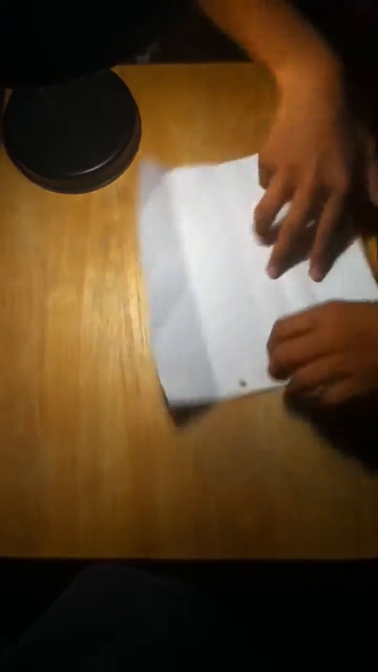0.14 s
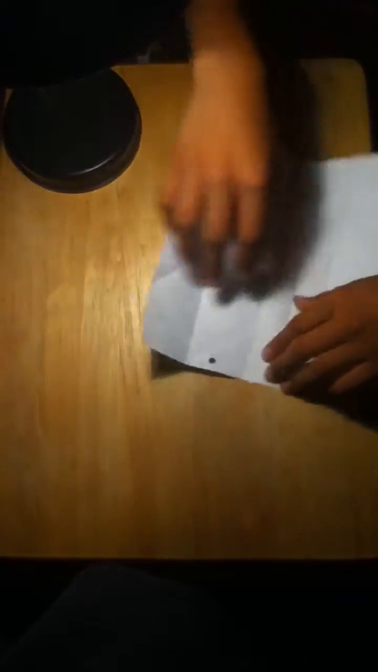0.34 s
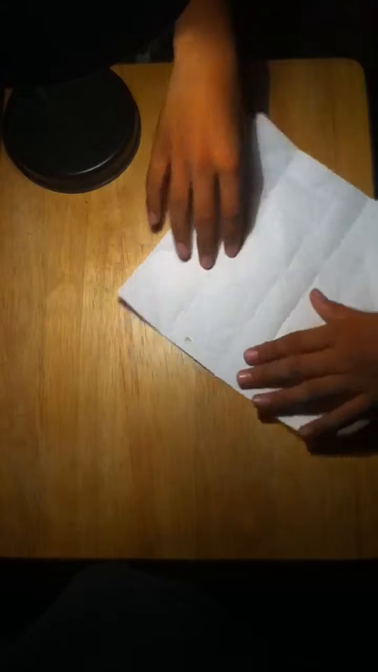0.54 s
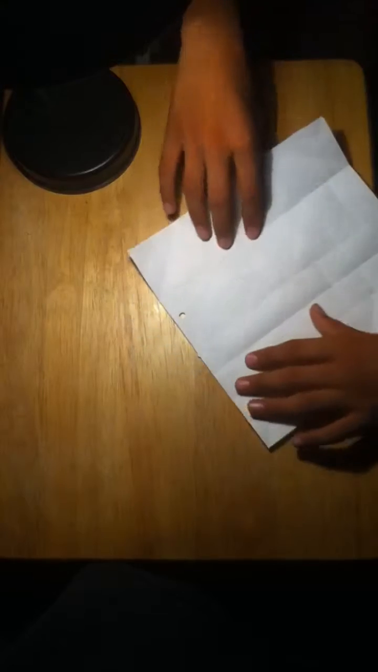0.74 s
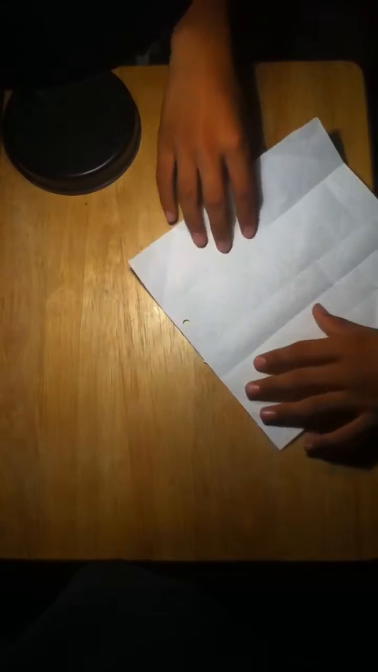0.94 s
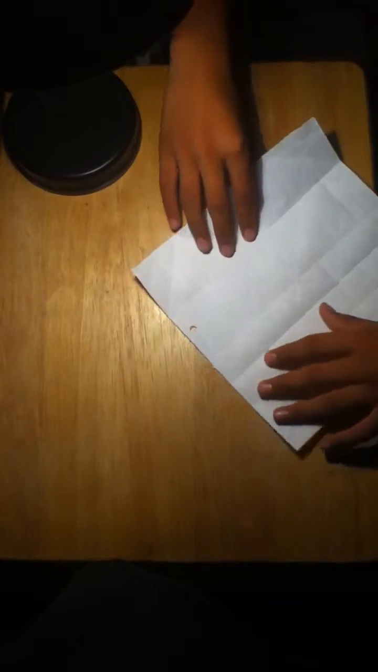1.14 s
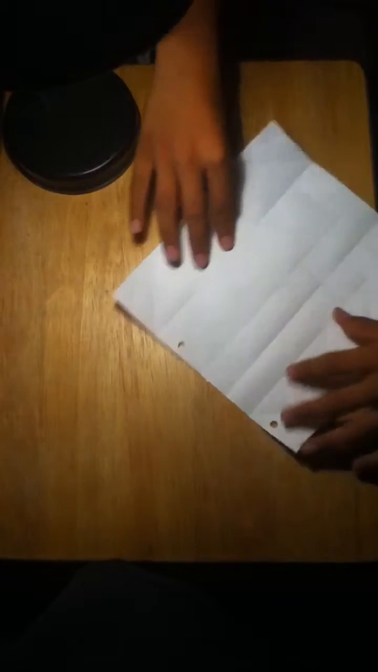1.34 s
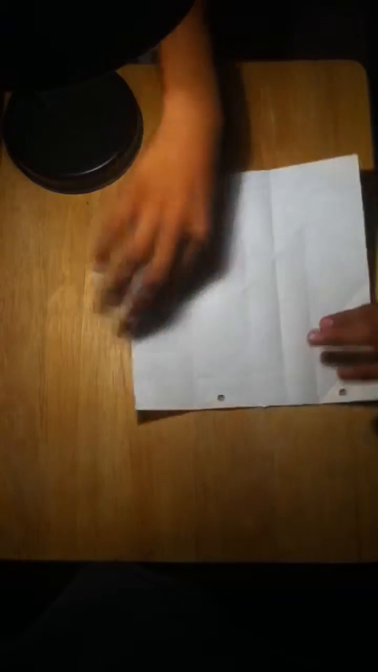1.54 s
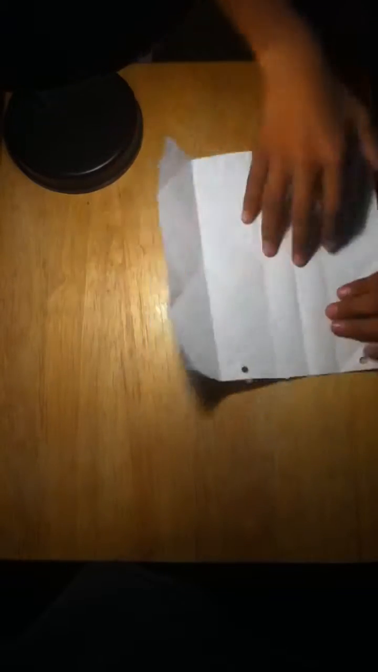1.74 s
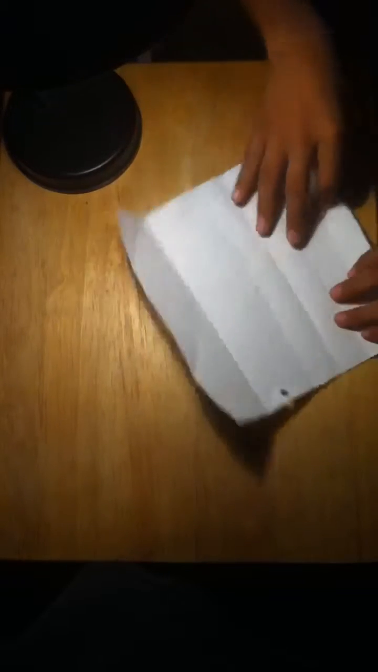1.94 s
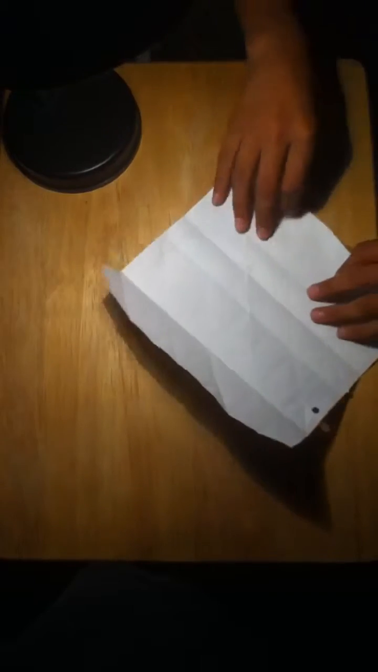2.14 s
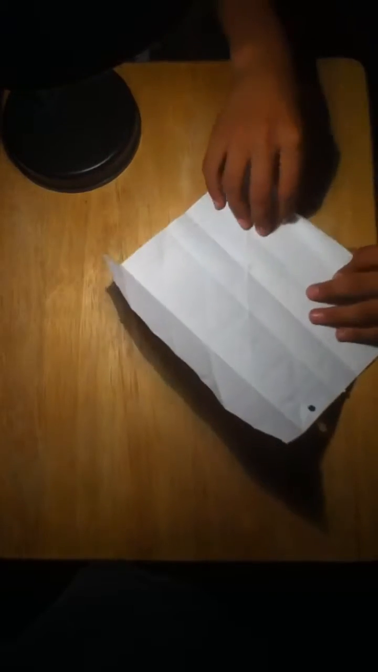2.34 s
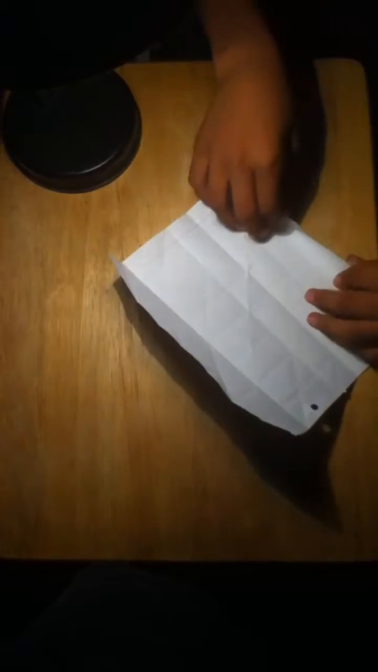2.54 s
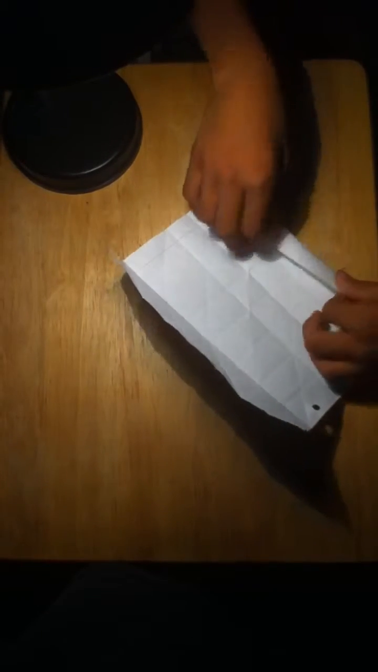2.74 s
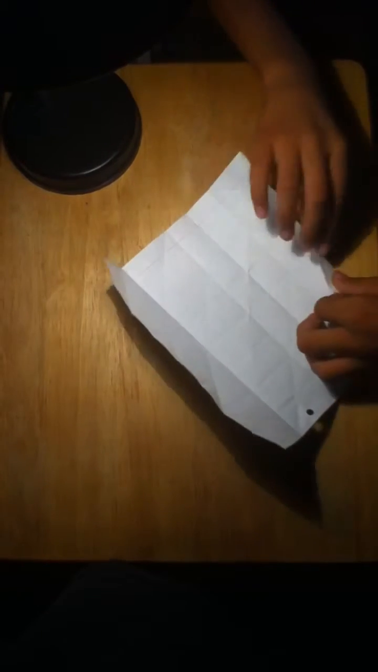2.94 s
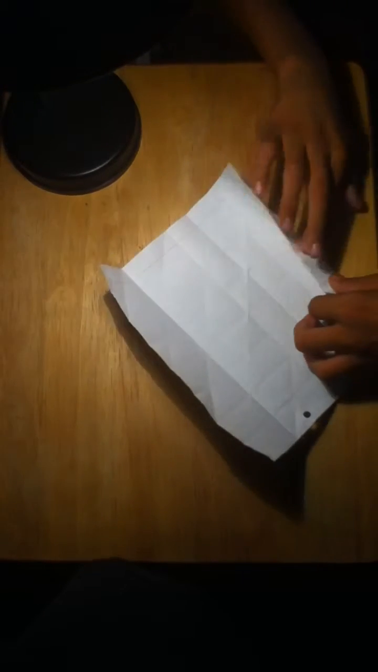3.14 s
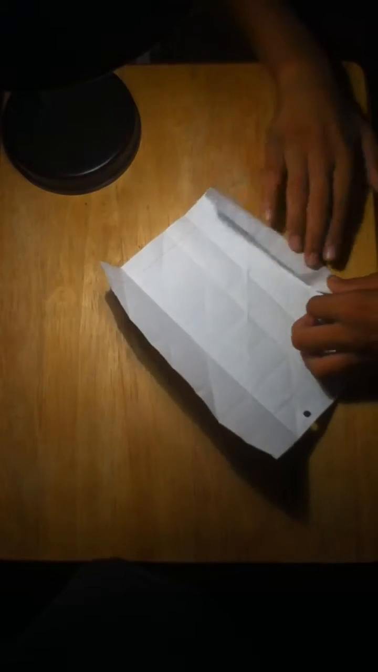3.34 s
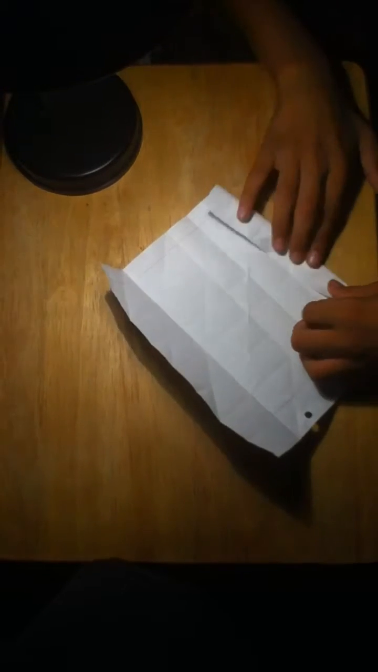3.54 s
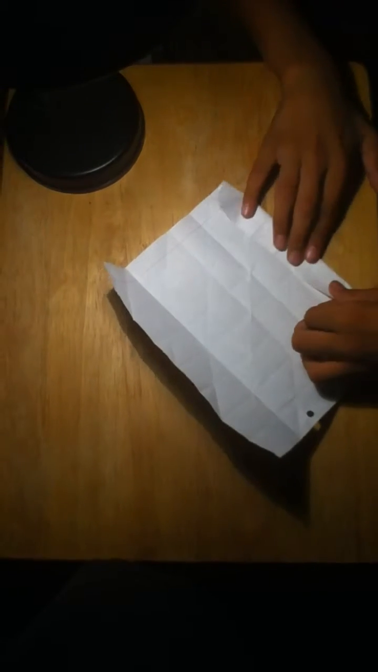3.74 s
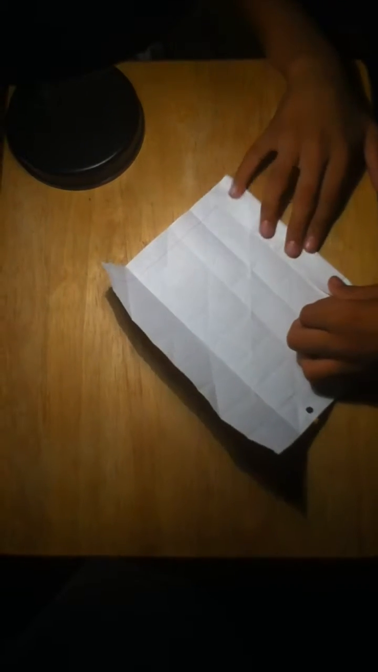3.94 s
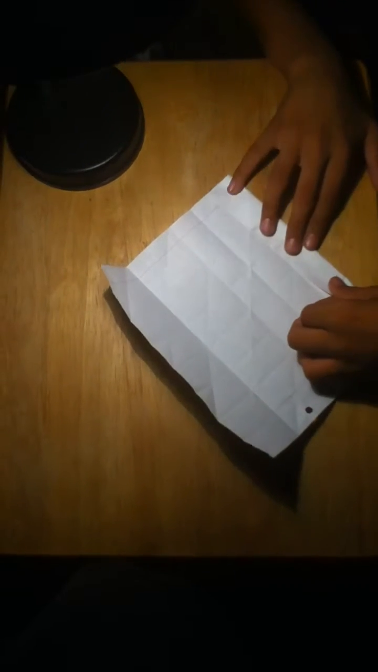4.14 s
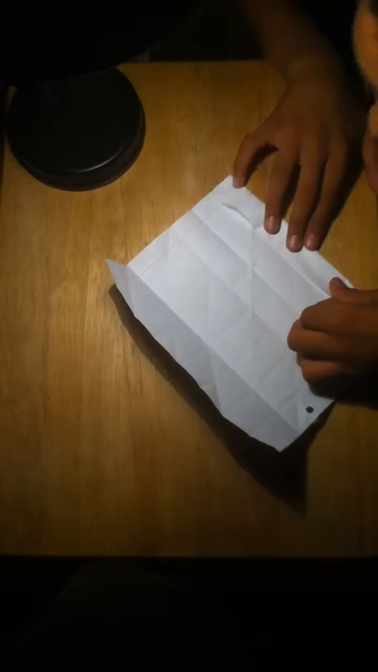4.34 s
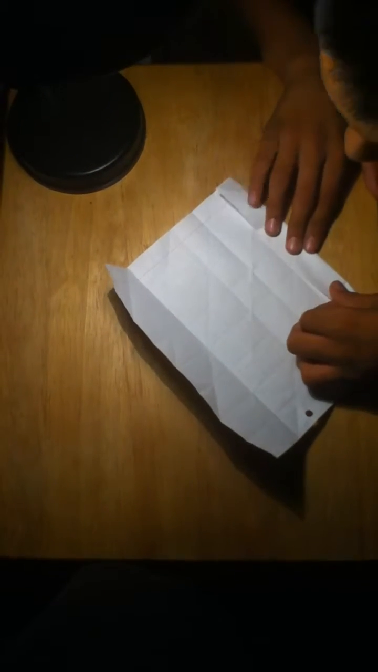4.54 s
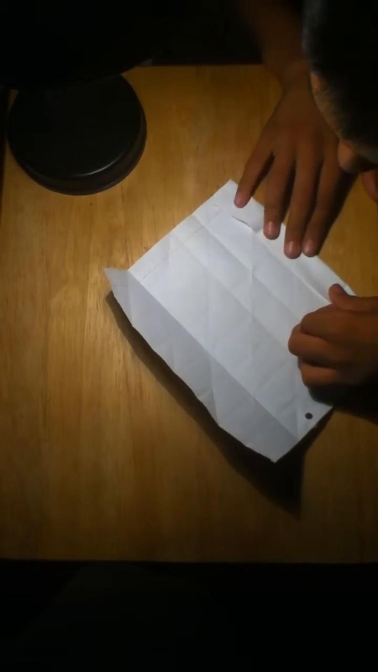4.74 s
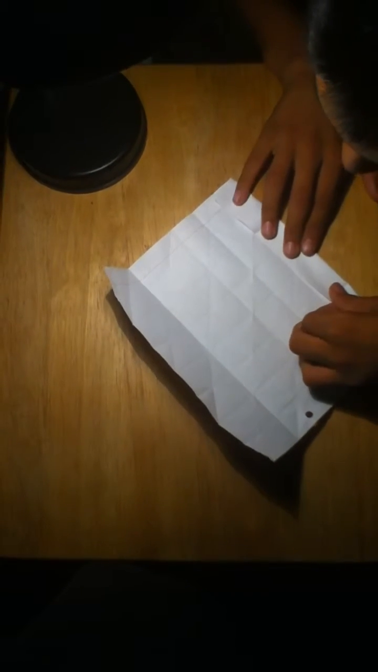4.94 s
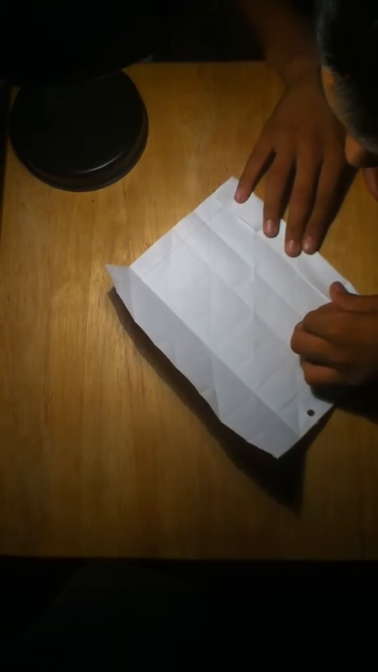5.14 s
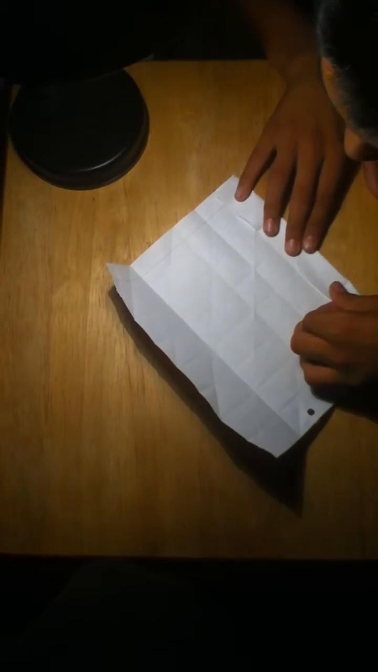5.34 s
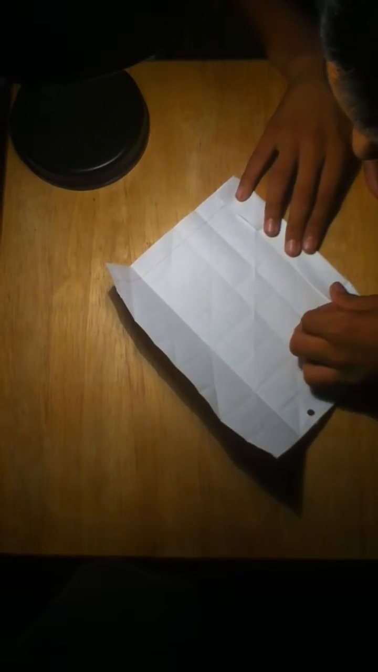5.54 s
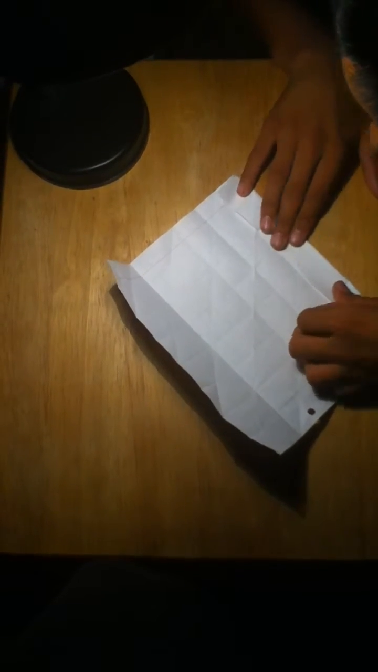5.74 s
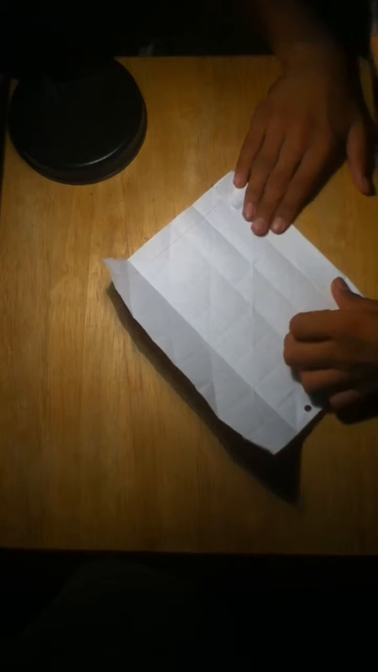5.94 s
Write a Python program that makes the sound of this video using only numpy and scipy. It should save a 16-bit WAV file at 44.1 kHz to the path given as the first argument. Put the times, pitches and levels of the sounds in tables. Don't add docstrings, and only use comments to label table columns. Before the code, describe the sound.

A sheet of paper hisses and rustles as it is turned on a wooden table, then creased with sharp snaps and faint crinkles.

```python
import sys
import numpy as np
from scipy import signal
from scipy.fft import rfft, irfft, next_fast_len
from scipy.io import wavfile

SR = 44100
rng = np.random.default_rng(int(sys.argv[2]) if len(sys.argv) > 2 else 0)


def boost(x):
    u = np.asarray(x, float) / 20
    return 10 ** u


def dump(signal):
    limited = np.clip(np.atleast_2d(signal).T, -1, 1)
    pcm = np.round(limited * 32767).astype(np.int16)
    wavfile.write(sys.argv[1], SR, pcm)


N = 263718


def rms_one(x):
    return x / np.sqrt(np.mean(x ** 2) + 1e-20)


def bandpass(x, order, low_hz, high_hz):
    return signal.sosfilt(signal.butter(order, [low_hz, high_hz], "band", fs=SR, output="sos"), x)


def resonate(x, hz, width_hz):
    r = np.exp(-np.pi * width_hz / SR)
    feedback = [1, -2 * r * np.cos(2 * np.pi * hz / SR), r * r]
    return signal.lfilter((1 - r * r) / 2 * np.array([1, 0, -1]), feedback, x)


def resonate_twice(x, hz, width_hz, second_width_hz):
    return resonate(resonate(x, hz, width_hz), hz, second_width_hz)


def ring(x, hz, t60):
    r, w = boost(-60 / (t60 * SR)), 2 * np.pi * hz / SR
    return signal.lfilter([0, np.sin(w)], [1, -2 * r * np.cos(w), r * r], x + 1e-18)


def drift(rate_hz):
    r = np.exp(-80 * np.pi * rate_hz / SR)
    white = rng.standard_normal(N // 40 + 2002)
    slow = signal.lfilter([1], [1, -2 * r, r * r], white)[2000:]
    return np.interp(np.arange(N) / 40, np.arange(len(slow)), rms_one(slow))


def floor():
    # frequency in Hz, level in dB per Hz.
    spectrum = [(18, -46), (30, -20), (141, -4), (199, -13), (227, -8.5), (415, -17), (584, -16.5),
                (740, -22.5), (801, -20), (1760, -23), (3220, -24.5), (3670, -24.5), (16000, -29.5)]
    # frequency in Hz, peak level in dB before a 6 dB trim.
    mains = [(60, -65.5), (120, -82)]
    floor_db = -56.5
    edges = 25 * 2 ** np.arange(0, 9.6, .5)
    white = rng.standard_normal((2, N + 9999))
    hz_points, db_points = np.transpose(spectrum)
    out = 0
    for k, (low, high) in enumerate(zip(edges, edges[1:])):
        band = bandpass(white[k % 2], 2, low, high)[9999:]
        band_db = np.interp(np.log(low * high) / 2, np.log(hz_points), db_points)
        out = out + band * boost(band_db + 0.48 * drift(0.91))
    hum = sum(boost(db - 6.0) * np.sin(2 * np.pi * hz * np.arange(N) / SR) for hz, db in mains)
    return boost(floor_db) * rms_one(out) + hum


def room(x):
    t60_s, cut_hz = 0.078, 6000
    size = next_fast_len(N + SR)
    turn = np.exp(-2j * np.pi * np.arange(size // 2 + 1) / size)
    dull = np.exp(-2 * np.pi * cut_hz / SR)
    lags = (rng.uniform(0.005, .03, 8) * SR).astype(int)
    response = 0
    for k, lag in enumerate(lags):
        loss = boost(-60 * lag / SR / t60_s)
        loop = loss * (1 - dull) / (1 - dull * turn) * turn ** lag
        response = response + (-1) ** k * loop / (1 - loop)
    return irfft(rfft(x, size) * response, size)[:N]


def table_top(push, ring_share):
    # frequency in Hz, level in dB, free ring time t60 in seconds.
    board = [(228, -16, .03), (308, -3.5, .12), (364, 0, .12), (470, -8, .05), (590, -9, .06),
             (900, -22, .05)]
    out = sum(boost(level_db) * ring(push, hz, t60 * ring_share) for hz, level_db, t60 in board)
    return bandpass(out, 3, 290, 1800)


def knocks():
    # start in seconds, peak in dB, slap in dB relative to the peak,
    # share of the free ring time left under the hand.
    taps = [(0.017, -30, 5.5, 0.46), (0.318, -34, -21, 0.54), (0.3527, -13, -15, 0.64),
            (0.3685, -20, -19, 0.72), (0.771, -33, -12, 1), (1.558, -42, 1, 0.82), (1.818, -42.5, 1, 1),
            (2.093, -39, -5, 0.26), (2.454, -29, -1, 0.22), (2.555, -37.5, -12, 0.26),
            (2.92, -37.5, 2, 0.45), (3, -42.5, -4, 0.37), (3.312, -31, -10, 0.15), (4.161, -41, -13, 0.48),
            (5.676, -42.5, 1, 0.76), (5.885, -39, -20, 0.42), (5.913, -43, 2, 0.29),
            (5.957, -32.5, -9, 0.9)]
    lag_s, size = 0.00149, 8000
    out = np.zeros(N + size)
    click = signal.lfilter([.12], [1, -.88], np.arange(size) == 0)
    slaps = rng.standard_normal((len(taps), size)) * np.exp(-np.arange(size) / SR / 0.0092)
    for (s, peak_db, slap_db, ring_share), slap in zip(taps, slaps):
        slap = resonate_twice(slap, 520, 1200, 1200)
        at = round((s + lag_s) * SR)
        out[at:at + size] += boost(peak_db - 4.0) * table_top(click, np.clip(ring_share, .1, 1.2))
        out[at:at + size] += boost(peak_db + slap_db + 1.0) * slap / np.abs(slap).max()
    return out[:N]


def every_snap():
    # start in seconds, peak in dB, facet pitch in Hz,
    # crack in dB relative to the facet tone, sheet flap in dB relative to the tone.
    crisp = [(1.6337, -27, 5800, -12, -40), (1.8966, -29.5, 4140, 6, -36), (1.944, -36, 2860, 0, -25),
             (1.9964, -28.5, 7100, -10, -8), (2.406, -31.5, 3230, 5, -30), (2.7997, -9, 3210, -12.5, -24),
             (2.8102, -36.5, 3500, -20, -37), (3.3528, -28.5, 2800, -28, 3), (3.6686, -32.5, 3240, -22, -5),
             (3.865, -26, 3500, 3, -35), (4.088, -31, 5400, -17, -16), (4.119, -23, 3600, -2, -18)]
    # start in seconds, peak in dB,
    # facet pitch in Hz, crack in dB relative to the tone, sheet flap in dB relative to the tone.
    crunches = [(0.0181, -20.5, 3370, -9.5, -4), (0.0436, -35, 2470, -14, -12),
                (0.125, -24.5, 4200, -10, -41), (0.3456, -34, 3000, -15, -23),
                (0.3542, -30, 2560, -12.5, -6), (2.4572, -31, 3570, -5, -7), (2.4662, -31, 3020, -4, -3),
                (2.921, -22, 2960, -20, -13.5), (3.112, -28, 3600, -2, 5), (3.185, -28.5, 3770, -38, -13),
                (3.1913, -18.5, 3220, -8, -20.5), (3.3132, -35.5, 3200, -26, -6),
                (3.3212, -31.5, 3020, -6, -1), (4.709, -35.5, 4200, -6, -25),
                (5.916, -25, 3600, -6.5, -3.5)]
    # start in seconds, peak in dB, facet pitch in Hz, sheet flap in relative dB.
    crackles = [(.5474, -47, 3160, -31), (.63, -44, 3100, -13), (.771, -53, 3960, -3),
                (.886, -46.5, 4040, -9), (1.8712, -44, 4500, -31), (1.8806, -32.5, 3800, -37),
                (2.0172, -36, 7500, -14), (2.1864, -39, 3970, -15), (2.5551, -45, 2870, 1),
                (2.614, -47.5, 4030, -7), (2.7316, -43.5, 2780, 20), (2.9154, -42, 3210, -19),
                (3.0045, -34.5, 3340, -15), (3.0324, -52, 3870, -2), (3.063, -35.5, 3660, -28),
                (3.0669, -34.5, 3100, -12), (3.1725, -36, 3970, -18), (3.2334, -36, 2600, -16),
                (1.8875, -31, 3500, -12), (3.5915, -35, 3600, 0), (3.6361, -42.5, 2880, -7),
                (3.7399, -41.5, 3630, 1), (4.505, -45.5, 3030, -16), (4.7134, -39.5, 2520, -2),
                (5.281, -43, 2780, -6), (5.676, -45.5, 2240, 11), (5.838, -44, 3300, -12),
                (5.8786, -40.5, 2780, -11), (5.9005, -47, 5000, -12)]
    # start in seconds, peak in dB.
    ticks = [(2.5894, -53), (2.7146, -51), (3.834, -48), (4.355, -51), (4.4049, -53), (5.1058, -58),
             (5.1594, -52), (5.727, -52)]
    tick_hz, tick_flap_db, small_crack_db = 4200, -4, -22.5
    crisp_ms, crunch_ms, small_ms = 1.5, 3.6, 1.8
    small = crackles + [(s, db, tick_hz, tick_flap_db) for s, db in ticks]
    flips = [(*row, crisp_ms) for row in crisp]
    flips += [(*row, crunch_ms) for row in crunches]
    flips += [(s, db, hz, small_crack_db, flap_db, small_ms) for s, db, hz, flap_db in small]
    return flips


def snaps():
    cycles, rattle_db, rattle_s, lag_s = 2.3, -36, .014, .0004
    flips, size = every_snap(), 2400
    out, t = np.zeros(N + size), np.arange(size) / SR
    noise = rng.standard_normal((len(flips), 2, size))
    for (s, peak_db, hz, crack_db, flap_db, burst_ms), (push, shake) in zip(flips, noise):
        age = t * 4000 / burst_ms
        burst = push * age * np.exp(-age)
        burst[0] = 1.3
        tone = resonate_twice(burst, hz, hz / cycles, hz / cycles)
        crack = bandpass(burst, 3, 1500, 8500)
        top = resonate(burst, 7730, 1700) + 0.15 * resonate(burst, 7700, 2480)
        flap = resonate(burst, 1800, 260) + 0.17 * resonate(burst, 570, 700)
        colours = [(tone, 0), (crack, crack_db + 7.5), (top, crack_db + 2), (flap, flap_db + 6.5)]
        snap = sum(boost(db) * part / np.abs(part).max() for part, db in colours)
        settling = bandpass(shake ** 3, 1, 1500, 5000) * np.exp(-t / rattle_s)
        at = round((s + lag_s) * SR)
        out[at:at + size] += boost(peak_db + 6.0) * (snap / np.abs(snap).max() + boost(rattle_db) * settling)
    return out[:N]


def motion():
    # middle in seconds, half length in seconds,
    # sliding in dB, scraping edge in dB relative to sliding, flexing sheet in dB relative to sliding.
    turns = [(0.033, 0.035, -44, -0.5, 6.5), (0.106, 0.047, -43.5, 1.5, -7), (0.217, 0.15, -48.5, 0.5, -15),
             (.25, 0.039, -46, 5, -10), (.283, 0.024, -42, 8.5, -9), (0.348, 0.028, -42.5, -6, 1.5),
             (0.428, 0.03, -46.5, 0, -5), (.51, 0.061, -46.5, 2, -5), (0.673, 0.11, -52, 1.5, -8),
             (0.774, 0.1, -49.5, -3.5, -9), (1.023, 0.057, -61, -1, -3.5), (1.154, 0.098, -57.5, 3.5, -5.5),
             (1.348, 0.054, -58, 0, -4), (1.46, 0.053, -43.5, -1.5, -10), (1.54, 0.032, -36, -2, -20),
             (1.606, 0.067, -43, 0, -12.5), (1.783, 0.067, -49.5, 3.5, -13), (1.891, 0.021, -46.5, 0, 1),
             (1.935, 0.027, -49, 4.5, 2.5), (2.048, 0.06, -42, 2.5, -8), (2.127, 0.036, -42, 2, -8),
             (2.2, 0.054, -57, 2, 4.5), (2.269, .035, -52.5, 1.5, -3.5)]
    # middle in seconds, half length in seconds,
    # sliding in dB, scraping edge in dB relative to sliding, flexing sheet in dB relative to sliding.
    folds = [(2.377, 0.045, -57, -2.5, 1), (2.468, 0.028, -48, 0.5, 1), (2.781, 0.024, -57.5, -8, 0),
             (2.85, 0.082, -50, -8.5, -17), (2.923, 0.014, -40.5, -5, -3.5), (3.016, 0.053, -51, -12, -2),
             (3.066, 0.057, -51, 1, 1.5), (3.196, 0.018, -35.5, -10.5, -8), (3.226, 0.039, -52, -15, 4.5),
             (3.333, 0.032, -49, -1.5, 8.5), (3.374, 0.042, -69, -5, 15.5), (3.593, 0.061, -53.5, -0.5, 3),
             (3.66, 0.016, -57, 2, -7), (3.762, 0.042, -57, -0.5, 2.5), (3.907, 0.068, -60, -2.5, -20),
             (4.03, 0.059, -56, 0.5, -13), (4.087, .035, -49, 1, -14), (4.418, 0.11, -63, 3, -4.5),
             (4.5, 0.03, -63.5, 9, -2), (4.775, 0.036, -53, -2.5, -22), (4.946, .04, -60, -3, -4),
             (5.962, 0.018, -45.5, -2, 1), (5.811, 0.057, -58.5, 2.5, -1), (5.907, 0.04, -53.5, 2, -5)]
    squareness = 2.5
    slip_db, slip_follows, fade_db_per_s = -48.5, 0.63, 256.5
    slip_mix = boost(np.array([[0], [-7], [-4]]))
    t = np.arange(0, N + 40, 40) / SR
    power = np.zeros((3, len(t)))
    for s, half_s, db, edge_db, flex_db in turns + folds:
        swell = np.exp(-np.abs((t - s) / half_s) ** squareness)
        power += (boost(db + np.array([[0], [edge_db], [flex_db]])) * swell) ** 2
    for s, db, *_ in every_snap():
        fading_db = slip_db + slip_follows * (db + 25) - fade_db_per_s * np.abs(t - s)
        power += (slip_mix * boost(fading_db) * (t >= s)) ** 2
    return [np.interp(np.arange(N) / SR, t, np.sqrt(row)) for row in power]


def friction(modes, per_s, spread_db, clump_db, flicker_db):
    clumps, out = boost(clump_db * drift(41)), 0
    for hz, width_hz, level_db in modes:
        sizes = boost(spread_db * np.minimum(rng.exponential(1, N), 4)) * rng.standard_normal(N)
        grains = sizes * (rng.random(N) < per_s / SR)
        rung = resonate_twice(grains, hz, width_hz, 2 * width_hz)
        out = out + boost(level_db + flicker_db * drift(12)) * rms_one(rung)
    return rms_one(clumps * out)


def handling():
    # frequency in Hz, width in Hz, level in dB.
    gap_modes = [(3600, 2050, -4), (4800, 1070, -12.5)]
    # frequency in Hz, width in Hz, level in dB.
    fold_modes = [(3390, 1460, 0.5), (5060, 420, -11.5)]
    # frequency in Hz, width in Hz, level in dB.
    edge_modes = [(6230, 1020, -1), (8160, 2060, 0.5), (9540, 3500, -1), (12600, 3100, -6.5)]
    # frequency in Hz, width in Hz, level in dB.
    sheet_modes = [(794, 380, -2), (1550, 710, 3.5), (2250, 2700, 2)]
    # frequency in Hz, width in Hz, level in dB.
    crease_modes = [(1894, 1700, 6.5), (3500, 1700, -2.5), (6500, 4800, -9.5)]
    # time in seconds, level in dB.
    hand_weight = [(0.0, -61.5), (0.43, -52.5), (0.51, -58.5), (1.27, -62.5), (1.83, -59), (1.98, -53.5),
                   (3.23, -67.5), (3.35, -63.5), (3.81, -68.5), (4.21, -62.5), (5.06, -65.5), (5.71, -59.5),
                   (5.91, -52), (5.98, -55)]
    lift_s = 2.2
    t = np.arange(N) / SR
    slide, scrape, bend = motion()
    flat = friction(gap_modes, per_s=12000, spread_db=1.8, clump_db=1.2, flicker_db=.9)
    lifted = friction(fold_modes, per_s=4000, spread_db=2.6, clump_db=1.8, flicker_db=.8)
    gap = slide * np.where(t < lift_s, flat, lifted)
    edge = scrape * friction(edge_modes, per_s=12000, spread_db=1.8, clump_db=1.5, flicker_db=1.6)
    flex = bend * friction(sheet_modes, per_s=2500, spread_db=1.0, clump_db=4.5, flicker_db=3.1)
    ticking = friction(crease_modes, per_s=570, spread_db=-0.5, clump_db=7.0, flicker_db=0)
    crinkle = boost(-10.5) * bend * ticking
    murmur = rms_one(table_top(rng.standard_normal(N), 0.29))
    drag = boost(np.interp(t, *np.transpose(hand_weight)) - 2.0) * murmur
    return gap + edge + flex + crinkle + drag


def scene():
    near = handling() + snaps() + knocks()
    return (near + boost(-15.0) * room(near) + floor())[None]


def top_cut(x):
    return signal.sosfilt(signal.butter(12, 15850, fs=SR, output="sos"), x)


def record(dry):
    cut = signal.sosfilt(signal.cheby2(16, 70, 16300, fs=SR, output="sos"), dry)
    return top_cut(cut)


dry = scene()
out = record(dry)
dump(out)
```